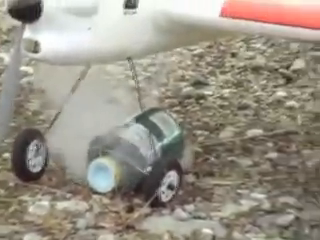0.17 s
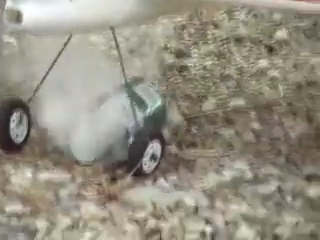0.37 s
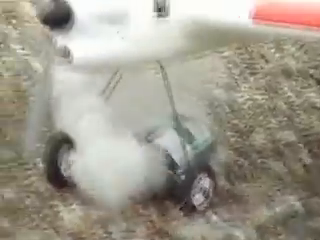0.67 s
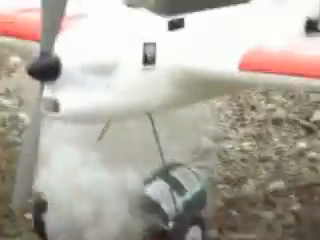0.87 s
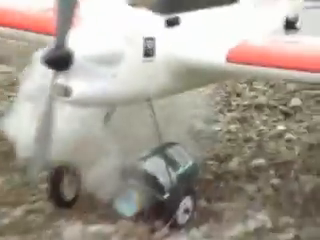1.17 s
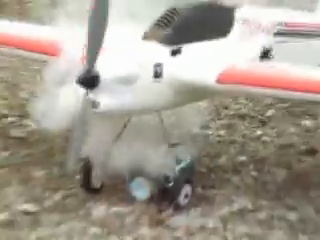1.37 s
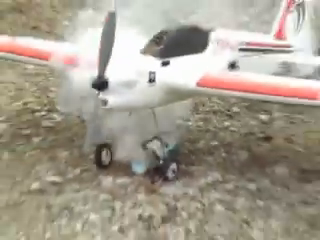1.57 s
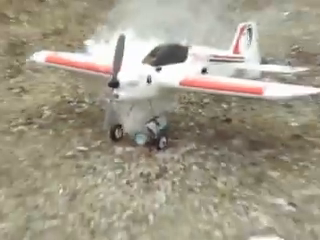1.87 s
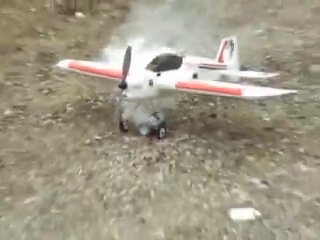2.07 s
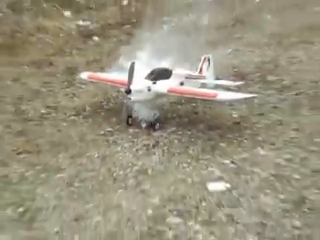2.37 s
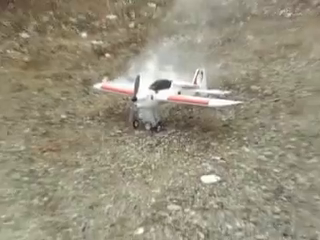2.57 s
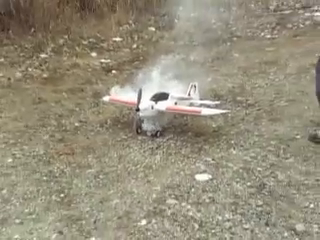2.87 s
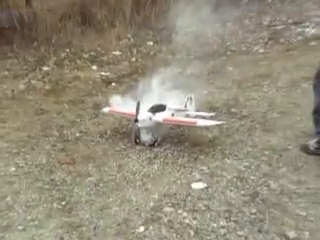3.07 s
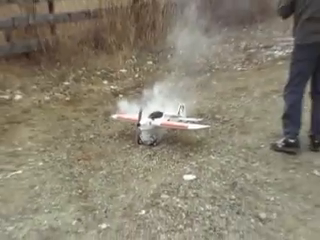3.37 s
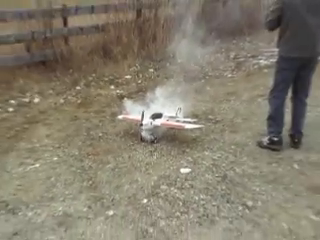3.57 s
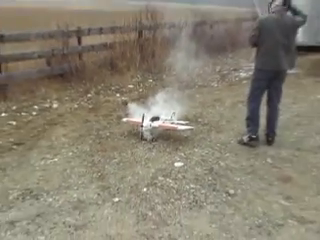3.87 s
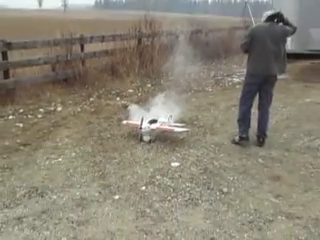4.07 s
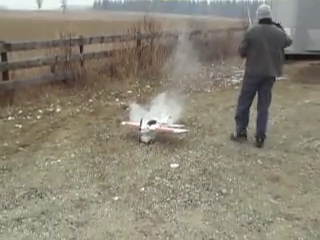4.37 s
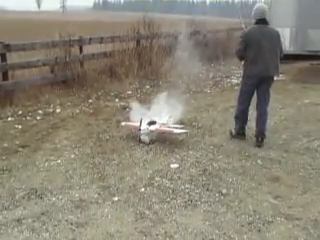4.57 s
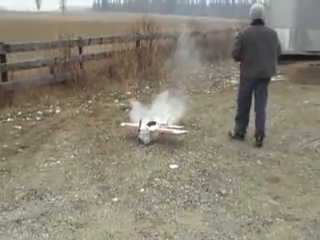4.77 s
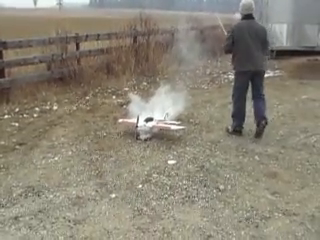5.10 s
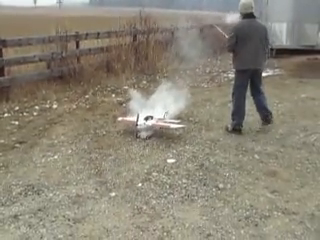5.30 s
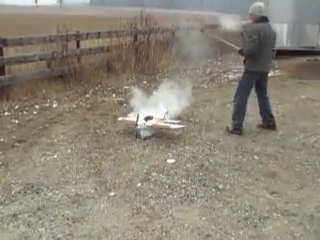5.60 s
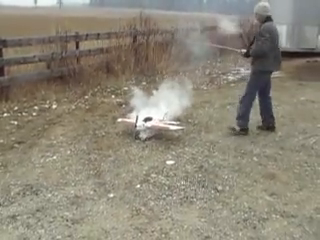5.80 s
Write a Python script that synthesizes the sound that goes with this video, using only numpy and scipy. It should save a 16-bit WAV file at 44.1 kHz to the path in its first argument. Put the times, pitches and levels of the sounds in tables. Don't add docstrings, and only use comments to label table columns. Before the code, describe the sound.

Close outdoor sound of a burning smoke charge in a tin: soft hiss, sudden loud crack, brief flare, then constant breathy rush. Small pops and ticks knock the metal unevenly, and a breathy leak wheezes faintly midway. Late on, stones click underfoot, one cracks loudly, and a softer scrape trails away. Faint low yard rumble, slight wind and thin motor whine; dry, no obvious reverberation.

```python
import sys
import numpy as np
from scipy import signal
from scipy.fft import rfft, irfft, next_fast_len
from scipy.io import wavfile
from scipy.ndimage import uniform_filter1d

SR = 44100
rng = np.random.default_rng(int(sys.argv[2]) if len(sys.argv) > 2 else 0)


def nominal_scale(level):
    x = np.asarray(level, float) / 20
    return 10 ** x


def output_pcm(signal):
    pcm = np.clip(np.atleast_2d(signal).T, -1, 1) * 32767
    wavfile.write(sys.argv[1], SR, np.round(pcm).astype(np.int16))


N = 261973
M = next_fast_len(N)
HZ = np.maximum(np.fft.rfftfreq(M, 1 / SR), 1)
SIDES = np.array([[1], [-1]])

# pitch_hz, density_db
YARD_COLOUR = [(80, -48), (110, -11), (170, -2.5), (240, -16.5), (400, -5.5), (600, -5), (780, -35)]
YARD_DB = -68.5
# pitch_hz, level_db, strongest_s
HUM_LINES = [
    (119.9, -84, 3.2),
    (181, -79, 5.2),
    (181, -80, .1),
    (239.8, -75, 3.3),
    (3117, -77, 2.7),
    (3357, -80, 2.7),
    (3597, -73, 2.7),
    (3836, -69.5, 3),
]
HUM_FADE_DB_PER_S2 = 1.6
# start_s, level_db, hold_s
GUSTS_OF_WIND = [(.02, -91, 0.025), (.18, -89, .01), (.4, -93, 0.013), (2.31, -77, .03), (2.91, -80, .01),
                 (3.2, -78, 0.017), (3.36, -78.5, .04), (3.51, -80, 0.084), (3.85, -78, 0.052),
                 (4.1, -78.5, .12), (4.48, -86, .03), (4.63, -84, 0.032), (4.75, -78, 0.02),
                 (5.26, -72, 0.0092), (5.41, -93, .01), (5.93, -76, .01)]
GUST_RISE_DB_PER_S, GUST_FALL_DB_PER_S = 330, 300

# time_s, gas_flow_db, can_draught_db
BURN_COURSE = [(0, -68.5, 2.5), (.28, -59, 0.5), (.33, -50.5, 0.5), (.53, -44, 1.5), (.71, -46, 0),
               (.82, -48.5, 0), (1.25, -53.5, -2), (1.59, -50, 1.5), (2.07, -49.5, 0.5), (2.3, -50.5, -1),
               (2.702, -50.5, -2), (3.45, -48, 0.4), (3.87, -50, -2.5), (3.93, -47, 1), (4.47, -49.5, -1.5),
               (4.8, -49.5, -1.5), (5.06, -50, -1.5), (5.94, -49.5, -1)]
STEADY_FLOW_DB = -50
CATCH_S, FLARE_RISE_S, FLARE_DIES_S = 0.378, 0.16, 0.42
# steady_level_db, flow_share, draught_share, flare_db, trend_db_per_s
HUM_LAW, ROAR_LAW, RUSH_LAW = (-56.5, 0.13, 0.9, 3.5, 0.03), (-56, 0.42, 1.17, 2, 0.16), (-52, 0.42, 0, 3.5, 0.07)
HISS_LAW, SIZZLE_LAW = (-50.5, 0.8, -0.64, 1.5, 0), (-54, 0.5, -0.67, 8, -0.23)
CORE_LAW, SKIRT_LAW = (-56.5, 2.5, 1.5, -16.5, -0.74), (-65.5, 1.5, -2.4, -3, 1.5)
# pitch_hz, density_db
ROAR_COLOUR = [(200, -17), (300, -10), (450, -11), (600, -14), (1000, -8.5), (1250, -6), (1700, -11),
               (2150, -8), (2450, -13.5), (2620, -14.5), (2900, -11), (3500, -12), (3800, -12.5),
               (4300, -25)]
# pitch_hz, density_db
RUSH_COLOUR = [(3300, -42), (3900, -9.5), (4200, -3), (4600, -0.5), (5300, 4), (5900, -1), (6700, -0.5),
               (7300, -26)]
# pitch_hz, density_db
HISS_COLOUR = [(3820, -51), (6500, -14), (7250, 1), (8300, -9.5), (10800, -12), (18300, -120)]
# pitch_hz, density_db
SIZZLE_COLOUR = [(7400, -19), (8000, -12), (8300, -27), (8900, 4), (9700, -1), (10300, 0.5), (11000, -1.5),
                 (12000, -2), (12900, -28)]
# pitch_hz, likeness
STEREO_LIKENESS = [(60, .99), (150, 0.7), (300, .65), (500, 0.8), (1000, 0.85), (2000, 0.9), (4000, .93),
                   (6300, .97), (7600, 1), (10000, 0.5), (11200, 0.53)]
CORE_HZ, CORE_WIDTH_HZ, SKIRT_HZ, SKIRT_WIDTH_HZ = 5750, 1300, 4520, 1040
# pitch_hz, width_hz, level_db
CHARGE_MODES = [(1210, 460, 18.5), (2250, 400, -35), (3000, 330, -13), (4080, 890, 4)]
# start_s, level_db, hold_s
LEAKS = [
    (3.3, -51, 0.08),
    (4.08, -57, 0.082),
    (4.82, -74, .05),
]
LEAK_RISE_DB_PER_S, LEAK_FALL_DB_PER_S = 47, 40

CAN_HZ, CAN_WIDTH_HZ, CAN_SIDE_DB = 727, 119, -16.5
NECK_MODE = (888, 80, -8)   # pitch_hz, width_hz, level_db
COLD_CAN_DB, CAN_SINGS_S = -9, 0.318
# pitch_hz, width_hz, level_db
TIN_MODES = [(1236, 70, -1), (1552, 60, 0), (2100, 120, -3), (3200, 450, -5), (4360, 2800, -12)]
# pitch_hz, width_hz, level_db
SPIT_TREBLE_MODES = [(4300, 1800, -6.5), (6450, 500, -5), (6400, 230, 3), (8550, 420, -16)]
# start_s, peak_db, pitch_hz, thump_db
WET_SPITS = [(.607, -51, 900, 11.5), (0.3204, -51, 930, 0), (0.4643, -40, 3000, -5),
             (0.8944, -39.5, 1280, -4), (0.9602, -41.5, 1460, -1), (1.0194, -40.5, 1370, 2),
             (1.172, -59, 900, 17), (1.4187, -30.5, 2080, -7), (1.4233, -32.5, 1240, -3),
             (1.6596, -29.5, 1230, -0.5), (1.9574, -37, 2080, -3.5), (2.012, -46, 1100, 6),
             (2.0398, -41.5, 2000, 3.5), (2.0694, -50.5, 1200, 16.5), (2.1979, -42, 2070, -1.5),
             (3.1263, -45, 1840, 2), (3.461, -37.5, 2900, -8), (3.6301, -43, 900, -6),
             (3.6785, -37.5, 3000, -7), (3.7408, -38.5, 1500, -19), (4.3996, -38.5, 1510, -5),
             (4.6578, -38.5, 1830, -1), (4.79, -52.5, 900, 14), (4.828, -57.5, 900, 18.5),
             (4.853, -55, 1500, 11), (4.903, -53, 900, 11.5), (5.6121, -40, 1470, 1.5),
             (5.6452, -38, 1430, -2), (5.87, -39.5, 1520, -13)]
# start_s, peak_db, pitch_hz
DRY_TICKS = [(.1381, -43, 1700), (3.4365, -37.5, 1700), (0.8385, -35, 2210), (1.04, -40, 2000),
             (1.121, -38.5, 2660), (1.491, -36.5, 1570), (2.484, -45, 2300), (2.6566, -35, 1500),
             (3.2665, -39, 1210), (3.4434, -35, 1400), (3.4847, -36, 2860), (3.5109, -37, 3120),
             (3.9492, -37, 1170), (4.2747, -37, 2000), (4.464, -33, 1490), (4.54, -38, 2170),
             (5.016, -39, 1560), (5.2265, -50.5, 1740)]
SPIT_T60_S, TICK_T60_S, LOW_RINGS_LONGER = 0.057, 0.016, 0.15
TICK_THUMP_DB, SPIT_TREBLE_DB, TICK_TREBLE_DB = -32, -15.5, -13

# start_s, peak_db, pitch_hz, echo_db
IGNITION_SNAP = [
    (.3875, -6, 5700, -17),
    (.3877, -22, 7300, -10),
    (.3876, -26, 11500, -14),
    (.3876, -24, 9300, -12),
    (.3878, -30, 3300, -10),
    (.3872, -31, 1900, -10),
    (.3872, -33, 1300, -12),
    (.3868, -33, 820, 0),
    (.3874, -32, 2600, -8),
]
# start_s, peak_db, pitch_hz, echo_db
CHARGE_PRICKS = [(0.43, -30.5, 6600, -2), (.378, -32, 9500, -8), (.8949, -37, 6700, -3),
                 (1.0212, -33.5, 4900, -4.5), (1.659, -37, 4470, -5), (2.5, -42, 3700, 5),
                 (2.204, -44, 2700, -1), (1.9585, -43, 1500, -11), (2.7, -35, 5600, -8),
                 (3.4618, -34, 4500, -11), (3.5115, -35, 3400, -7), (3.5118, -38, 3700, 1),
                 (3.462, -46, 3060, 0), (3.7, -41, 3300, 2), (3.1, -37, 2030, -3), (2.3, -46, 2800, -5),
                 (3.741, -40, 2900, -10), (5.016, -49, 3200, -6), (1.4, -32, 2040, -1),
                 (2.4, -49, 3300, -10), (1.6, -39, 5200, -1), (2.4, -43, 3600, -11),
                 (1.2, -38, 3600, -15.5), (2.4838, -43.5, 3300, -9)]
# start_s, peak_db, pitch_hz, echo_db
STONE_CLICKS = [(5.2535, -31.5, 1570, -18), (5.2535, -40, 3200, -12), (5.2858, -27, 4500, -9),
                (5.2862, -39, 6300, -5), (5.301, -31, 4000, -14), (5.3175, -50, 2520, -10),
                (5.3177, -17.5, 4900, -5), (5.3178, -25, 7000, -10), (5.291, -35, 5200, -3),
                (5.2955, -35, 4330, -3), (5.3075, -37, 5000, -7), (5.3172, -35.5, 770, 5),
                (5.3325, -32, 4600, -8), (5.3355, -22.5, 5100, -1.5), (5.3362, -40, 8000, 5),
                (5.3177, -33, 9400, -17), (5.3355, -25.5, 1110, -1), (5.3362, -33, 3000, 2),
                (5.3435, -30, 6400, -7)]
# start_s, peak_db, pitch_hz, echo_db
HARD_STONE = [(5.4034, -29, 6000, -8), (5.4059, -9.5, 5600, -11), (5.4053, -13, 3900, -11),
              (5.4066, -26, 3200, -14), (5.4054, -18.5, 2200, -8), (5.4055, -21, 1100, -14),
              (5.4066, -19, 6900, -14), (5.4045, -31, 9300, -4), (5.4008, -36, 8000, -3),
              (5.4056, -27, 720, -10), (5.4085, -24, 2600, -6), (5.4105, -24, 5200, -4)]
CRACK_TAIL_S, STONE_TAIL_S, PRICK_TAIL_S = .021, .016, .018
LOW_CRACKS_LONGER = 0.32
CRACK_PAN_DB = 1.2
# start_s, level_db, hold_s
BOOT_DRAGS = [
    [(5.289, -45, 0.029), (5.334, -44, 0.0047)],
    [(5.5, -54, .02), (5.55, -51, 0.013), (5.612, -47, 0.025), (5.66, -49.5, 0.022), (5.755, -54, 0.018),
     (5.85, -59, .01)],
]
# pitch_hz, width_hz, level_db
GRAVEL_MODES = [
    [(805, 330, -16), (1200, 250, 6), (4600, 1500, -3.5)],
    [(1430, 450, 0), (1570, 82, 10), (1940, 190, -3.5)],
]
# rise_db_per_s, fall_db_per_s
DRAG_SLOPES = [(500, 800), (250, 190)]
DRAG_PAN_DB = (3.5, 0.6)

# pitch_hz, lead_rad
PORT_LEAD = [(0, -0.7), (6630, 0.0), (7150, 0.88), (8440, 0.38), (9220, 1.5), (9820, 0), (10200, 1.5),
             (10500, -2.5), (11100, -0.2), (12600, 1.5)]
# pitch_hz, balance_db
PORT_LEAN = [(100, 0), (7400, 0), (8400, 4), (10000, 4.5), (11000, 2), (12500, 1)]
NOTCH_HZ, NOTCH_SAG_HZ_PER_S = (9150, 10790), (63, 133)
CLOSE_SHIFT_HZ, CLOSE_S = (1610, 350), 0.15
# time_s, level_db
NOTCH_DEPTH = [
    (0, -2.5),
    (.8, -8),
    (1.7, -11.5),
    (3, -8.5),
    (4.5, -4.5),
    (5.94, -6),
]
TOP_START_DB, TOP_DULLS_DB_PER_S = 0.5, 2
# pitch_hz, threshold_db
LOST_UNDER = [(40, -26), (90, -15), (130, -16), (170, -17), (300, -21), (2000, -22), (2450, -20),
              (2600, -15.5), (2750, -20), (3700, -18), (3900, -14.5), (4100, -18), (7000, -17), (8500, -13),
              (10500, -15), (12500, -19)]
EDGE_HZ, EDGE_SAG_HZ_PER_S, EDGE_WANDER_HZ = 12750, 170, 220
EDGE_DIP_S, EDGE_DIP_HZ, EDGE_DIP_WIDTH_S = 7.2, 800, .17
SIDE_DROP_DB, SIDE_WAVER_DB = 11.5, 6


def rms_one(x):
    return x / np.sqrt(np.mean(x ** 2) + 1e-20)


def at_hz(points):
    hz, value = np.transpose(points)
    return np.interp(np.log(HZ), np.log(np.maximum(hz, 1)), value)


def drift(rate):
    r = np.exp(-80 * np.pi * rate / SR)
    noise = rng.standard_normal(N // 40 + 2002)
    slow = signal.lfilter([1], [1, -2 * r, r * r], noise)[2000:]
    return np.interp(np.arange(N) / 40, np.arange(len(slow)), rms_one(slow))


def resonate(x, hz, width_hz):
    r = np.exp(-np.pi * width_hz / SR)
    zeros = np.array([1, 0, -1]) * (1 - r * r) / 2
    return signal.lfilter(zeros, [1, -2 * r * np.cos(2 * np.pi * hz / SR), r * r], x + 1e-18)


def through(x, modes):
    return sum((-1) ** k * nominal_scale(db) * resonate(x, hz, width) for k, (hz, width, db) in enumerate(modes))


def above(x, hz):
    return signal.sosfilt(signal.butter(4, hz, "high", fs=SR, output="sos"), x)


def lean_right(pan_db):
    return nominal_scale(-pan_db * SIDES)


def swells(rows, rise_db, fall_db):
    t = np.arange(N) / SR
    levels = [db - rise_db * np.maximum(s - t, 0) - fall_db * np.maximum(t - s - hold, 0)
              for s, db, hold in rows]
    return nominal_scale(np.max(levels, axis=0))


def burning(level_db, flow_share, draught_share, flare_db, trend_db):
    t = np.arange(N) / SR
    s, flow_db, draught_db = np.transpose(BURN_COURSE)
    flare = np.clip((t - CATCH_S) / FLARE_RISE_S + 1, 0, 1)
    flare = flare * np.exp(-np.maximum(t - CATCH_S, 0) / FLARE_DIES_S)
    swing_db = flow_share * (flow_db - STEADY_FLOW_DB) + draught_share * draught_db
    return nominal_scale(level_db + np.interp(t, s, swing_db) + flare_db * flare + trend_db * t)


def turbulence(spectrum, flicker_db, rate, count):
    alike = np.clip(at_hz(STEREO_LIKENESS), 0, 1)
    mid, side = rfft(rng.standard_normal((2, M))) * nominal_scale(at_hz(spectrum))
    pair = np.sqrt(1 + alike) * mid + np.sqrt(1 - alike) * side * SIDES
    low, high = spectrum[0][0], spectrum[-1][0]
    place = np.interp(np.log(HZ), np.log([low, high]), [0, count - 1])
    inside = (HZ > low) & (HZ < high)
    total = 0
    for k in range(count):
        near = (place // 1 == k) | (place // 1 == k - 1)
        share = np.clip(1 - abs(place - k), 0, 1) ** .5 * near
        band = irfft(pair * inside * share, M)[:, :N]
        total = total + band * nominal_scale(flicker_db * drift(rate))
    return rms_one(total)


def far_yard():
    return nominal_scale(YARD_DB) * turbulence(YARD_COLOUR, 3.6, 4.6, count=4)


def hum():
    t = np.arange(N) / SR
    return sum(nominal_scale(db + 3.0 - HUM_FADE_DB_PER_S2 * (t - s) ** 2)
               * np.sin(2 * np.pi * (hz * t + rng.random())) for hz, db, s in HUM_LINES)


def wind():
    air = resonate(resonate(rng.standard_normal(N), 62, 40), 62, 60)
    return swells(GUSTS_OF_WIND, GUST_RISE_DB_PER_S, GUST_FALL_DB_PER_S) * rms_one(above(air, 50))


def jet():
    flutter = nominal_scale(0.58 * drift(13.3))
    grains = rng.random(N) < 300 / SR
    grains = grains * nominal_scale(4.5 * np.minimum(rng.exponential(1, N), 2.5)) * rng.choice([-1, 1], N)
    crackle = nominal_scale(-12.0) * rms_one(through(grains, CHARGE_MODES))
    roar = burning(*ROAR_LAW) * (turbulence(ROAR_COLOUR, 2.4, 6.6, count=6) + crackle)
    rush = burning(*RUSH_LAW) * turbulence(RUSH_COLOUR, 0.34, 2.7, count=4)
    hiss = burning(*HISS_LAW) * turbulence(HISS_COLOUR, 1.0, 2.5, count=2)
    sizzle = burning(*SIZZLE_LAW) * turbulence(SIZZLE_COLOUR, 1.17, 18.0, count=6)
    return flutter * (roar + rush + hiss) + sizzle


def singing_rush():
    parts = [(CORE_LAW, CORE_HZ, CORE_WIDTH_HZ), (SKIRT_LAW, SKIRT_HZ, SKIRT_WIDTH_HZ)]
    total = np.zeros(N)
    for law, hz, width in parts:
        band = resonate(resonate(rng.standard_normal(N), hz, width), hz, width)
        total += burning(*law) * rms_one(band)
    return total


def can_hum():
    mid, side = rng.standard_normal((2, N)) * nominal_scale(1.3 * drift(26))
    air = mid + nominal_scale(CAN_SIDE_DB) * side * SIDES
    locked = nominal_scale(COLD_CAN_DB * np.clip((CAN_SINGS_S - np.arange(N) / SR) / .03, 0, 1))
    cavity = through(air, [(CAN_HZ, CAN_WIDTH_HZ, 0), NECK_MODE])
    return locked * burning(*HUM_LAW) * rms_one(resonate(cavity, CAN_HZ, 560))


def spits():
    out, t = np.zeros(N), np.arange(4000) / SR
    rows = [spit + (SPIT_T60_S, SPIT_TREBLE_DB) for spit in WET_SPITS]
    rows += [tick + (TICK_THUMP_DB, TICK_T60_S, TICK_TREBLE_DB) for tick in DRY_TICKS]
    for s, db, hz, thump_db, ring_s, treble_db in rows:
        t60 = ring_s * (1500 / hz) ** LOW_RINGS_LONGER
        air = rng.standard_normal(len(t)) * np.clip(t / 0.00028, 0, 1)
        puff = air * (nominal_scale(-60 * t / t60) + nominal_scale(-60 * t / 0.0077))
        knock = 0.88 * resonate(puff, hz, 20 / ring_s) + 0.86 * through(puff, TIN_MODES)
        treble = through(puff, SPIT_TREBLE_MODES)
        thump = resonate(air * nominal_scale(-35 * t / t60), 647, 160)
        layers = [(0, knock), (treble_db, treble), (thump_db, thump)]
        sound = sum(nominal_scale(gain_db) * x / abs(x).max() for gain_db, x in layers)
        at = round(s * SR)
        out[at:at + len(t)] += nominal_scale(db) * sound[:N - at]
    return above(out, 550)


def snaps(table, crack_s, t60, wide):
    out, t = np.zeros((2, N)), np.arange(4000) / SR
    for s, db, hz, echo_db in table:
        length = crack_s * (4000 / hz) ** LOW_CRACKS_LONGER
        burst = np.sin(np.pi * np.clip(t / length, 0, 1)) ** 2
        turns = rng.random() + 0.037 * wide * rng.normal() * SIDES
        crack = burst * np.sin(2 * np.pi * (hz * t + turns))
        tail = nominal_scale(echo_db - 60 * t / t60) * np.clip(2 * t / length - 1, 0, 1)
        mid, side = resonate(rng.standard_normal((2, len(t))), hz, 0.26 * hz)
        at = round(s * SR)
        out[:, at:at + len(t)] += nominal_scale(db) * (crack + tail * rms_one(mid + wide * side * SIDES))
    return above(out, 590)


def charge():
    ignition = snaps(IGNITION_SNAP, crack_s=0.0012, t60=0.041, wide=0.065)
    pricks = snaps(CHARGE_PRICKS, crack_s=0.0015, t60=PRICK_TAIL_S, wide=.05)
    return spits() + ignition + pricks


def wheeze():
    leak = resonate(resonate(rng.standard_normal(N), 2200, 200), 1770, 300)
    return nominal_scale(-11.0) * swells(LEAKS, LEAK_RISE_DB_PER_S, LEAK_FALL_DB_PER_S) * rms_one(leak)


def scuff():
    clicks = rng.random(N) < 2500 / SR
    clicks = clicks * nominal_scale(1.1 * np.minimum(rng.exponential(1, N), 4)) * rng.choice([-1, 1], N)
    total = np.zeros((2, N))
    for shoves, slopes, modes, pan_db in zip(BOOT_DRAGS, DRAG_SLOPES, GRAVEL_MODES, DRAG_PAN_DB):
        drag = swells(shoves, *slopes) * rms_one(through(clicks, modes))
        total += above(drag, 490) * lean_right(pan_db)
    return total


def boot():
    stones = snaps(STONE_CLICKS, crack_s=0.0016, t60=STONE_TAIL_S, wide=0.42) * lean_right(.8)
    crack = snaps(HARD_STONE, crack_s=0.0021, t60=CRACK_TAIL_S, wide=0.35) * lean_right(CRACK_PAN_DB)
    return stones + crack + scuff()


def microphone_ports(x):
    half = nominal_scale(at_hz(PORT_LEAN) / 2) * np.exp(.5j * at_hz(PORT_LEAD))
    return irfft(rfft(x, M) * np.array([half, 1 / half]), M)[:, :N]


def camera_thinning(x):
    mid_side = np.array([x[0] + x[1], x[0] - x[1]]) / 2
    hz, s, z = signal.stft(mid_side, SR, nperseg=2048, noverlap=1024)
    rows = hz[:, None]
    z *= nominal_scale((TOP_START_DB - TOP_DULLS_DB_PER_S * s) * np.clip((rows - 10500) / 1200, 0, 1))
    for start, sag, shift in zip(NOTCH_HZ, NOTCH_SAG_HZ_PER_S, CLOSE_SHIFT_HZ):
        centre = start - sag * s - shift * np.exp(-s / CLOSE_S)
        depth_db = np.interp(s, *np.transpose(NOTCH_DEPTH))
        z[0] *= nominal_scale(depth_db * np.exp(-((rows - centre) / 170) ** 2))

    power = uniform_filter1d(uniform_filter1d(abs(z) ** 2, size=3, axis=2), size=4, axis=1)
    hiss = power[0, (hz > 4000) & (hz < 8000)].mean(axis=0)
    hiss = np.minimum(hiss, 8 * np.median(hiss))
    hiss = signal.lfilter([.25], [1, -.75], hiss)
    limit_hz, limit_db = np.transpose(LOST_UNDER)
    limit = nominal_scale(2 * np.interp(np.log(hz + 1), np.log(limit_hz), limit_db))

    held = s // .07 * .07
    edge = EDGE_HZ - EDGE_SAG_HZ_PER_S * held
    edge = edge - EDGE_DIP_HZ * np.exp(-((held - EDGE_DIP_S) / EDGE_DIP_WIDTH_S) ** 2)
    edge = edge + EDGE_WANDER_HZ * drift(1.5)[np.minimum((held * SR).astype(int), N - 1)]
    edge = edge // 172 * 172 + 86

    luck = uniform_filter1d(rng.standard_normal(power.shape), size=4, axis=2) * 2
    power = power * nominal_scale(luck * (4 * (rows > 7500) + .6 * (rows < 250)))
    side_db = SIDE_WAVER_DB * drift(4.0)[np.minimum((s * SR).astype(int), N - 1)] + 8 * luck[1]
    side_db = side_db - 2 * SIDE_DROP_DB * np.clip(rows / 600, .8, 1)
    power[1] *= nominal_scale(side_db * (rows < 6500))

    band = np.minimum(np.arange(len(hz)) // 4 * 4 + 2, len(hz) - 1)
    keep = (power[:, band] > limit[:, None] * hiss) & (rows < edge)
    mid, side = signal.istft(z * keep, SR, nperseg=2048, noverlap=1024)[1][:, :N]
    return np.array([mid + side, mid - side])


def scene():
    surroundings = far_yard() + hum() + wind()
    candle = jet() + singing_rush() + can_hum() + charge() + wheeze()
    return surroundings + candle + boot()


def roll_off(x):
    return signal.sosfilt(signal.butter(12, 13010, fs=SR, output="sos"), x)


def record(dry):
    mix = camera_thinning(microphone_ports(dry))
    return roll_off(mix)


dry = scene()
out = record(dry)
output_pcm(out)
```